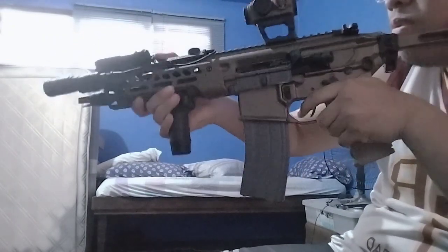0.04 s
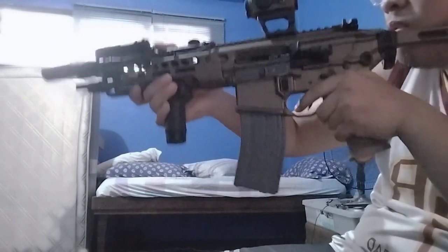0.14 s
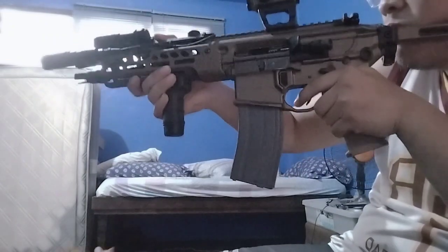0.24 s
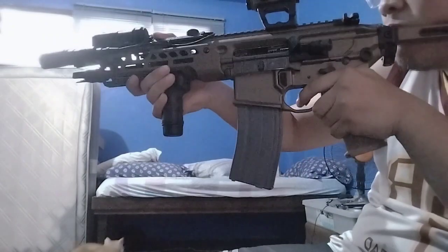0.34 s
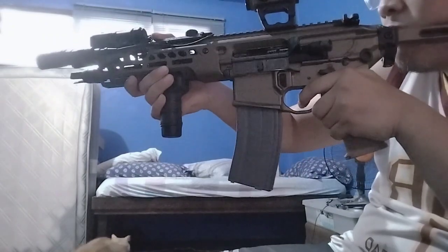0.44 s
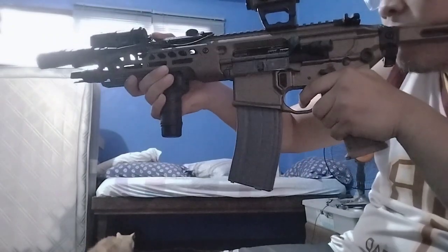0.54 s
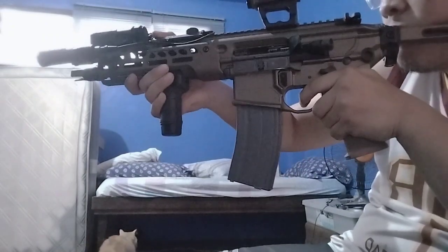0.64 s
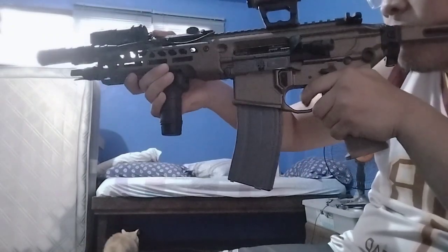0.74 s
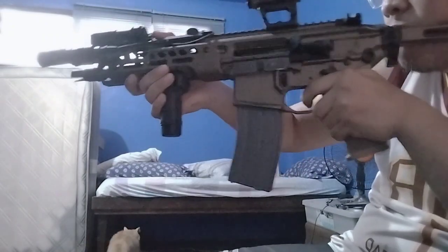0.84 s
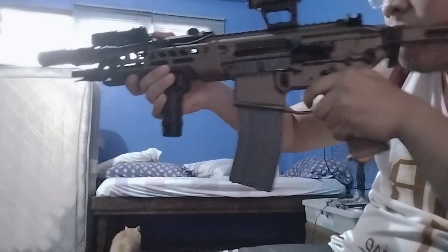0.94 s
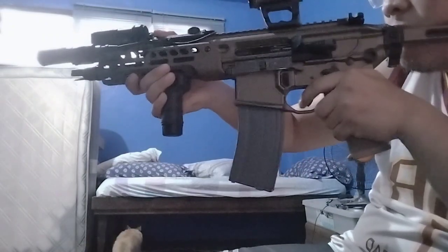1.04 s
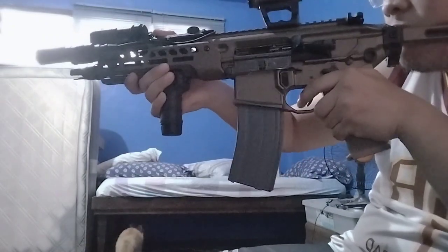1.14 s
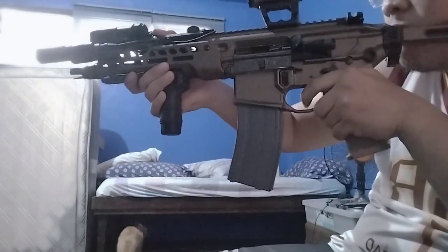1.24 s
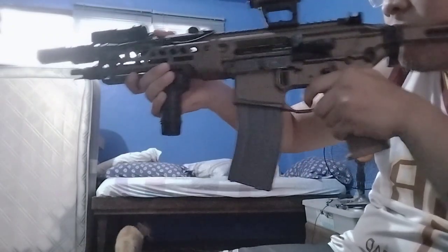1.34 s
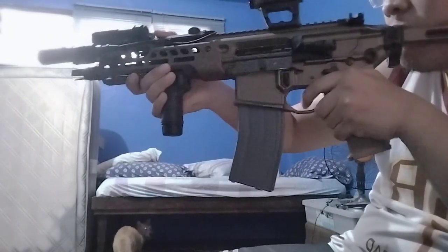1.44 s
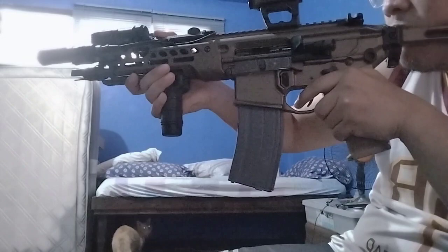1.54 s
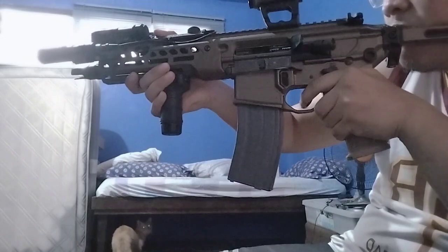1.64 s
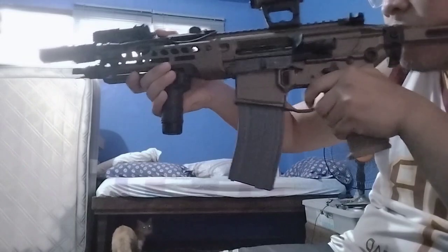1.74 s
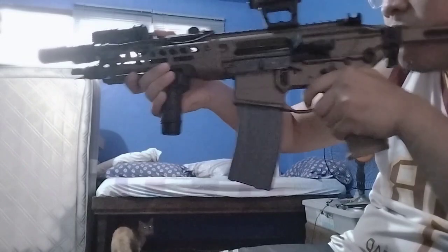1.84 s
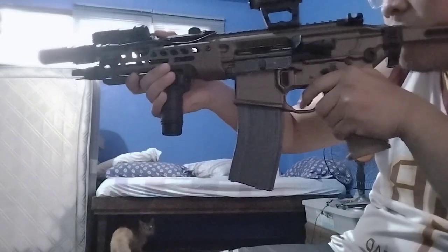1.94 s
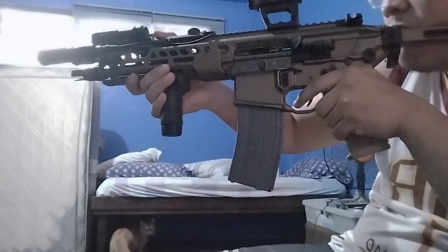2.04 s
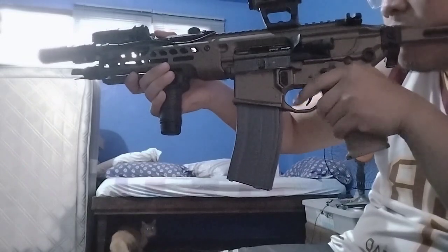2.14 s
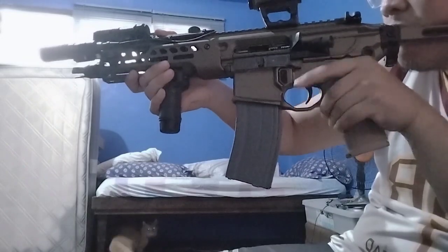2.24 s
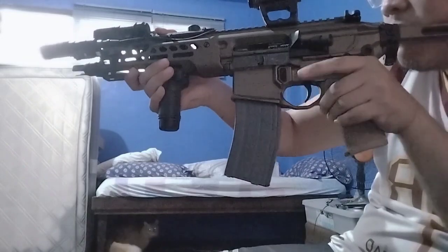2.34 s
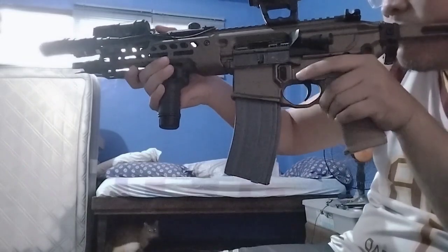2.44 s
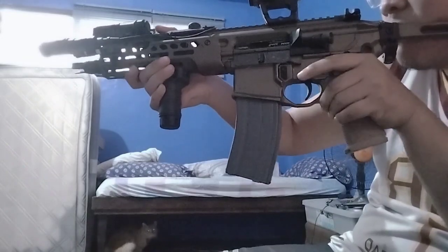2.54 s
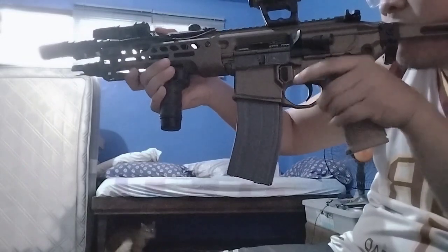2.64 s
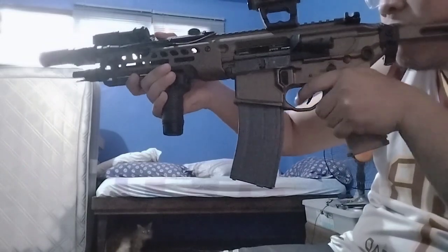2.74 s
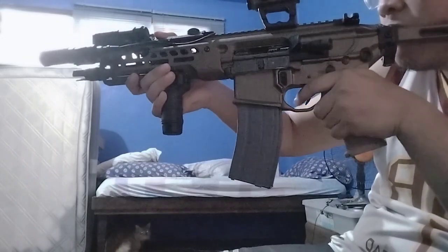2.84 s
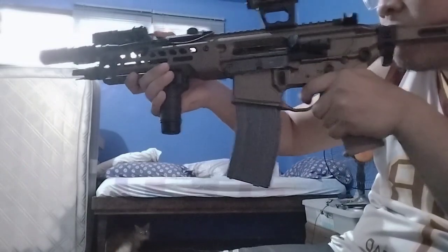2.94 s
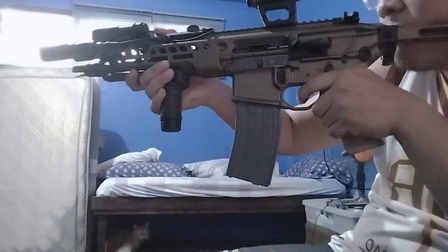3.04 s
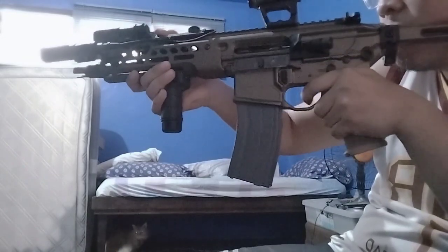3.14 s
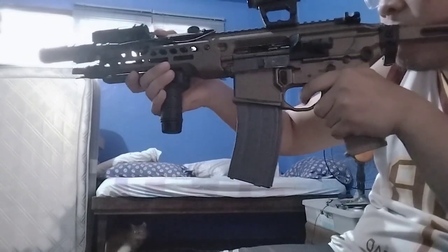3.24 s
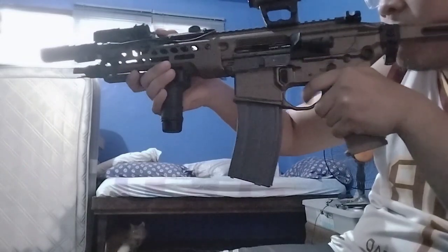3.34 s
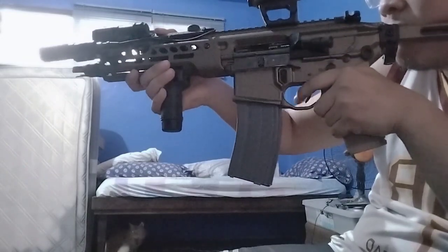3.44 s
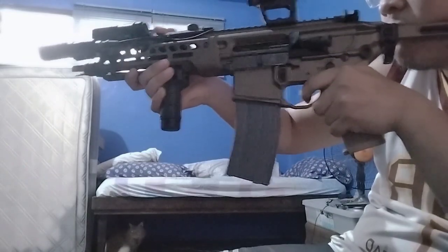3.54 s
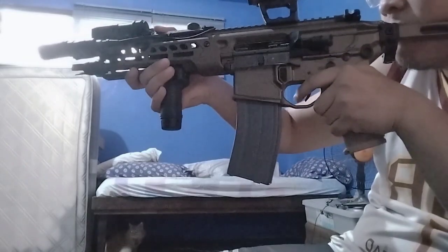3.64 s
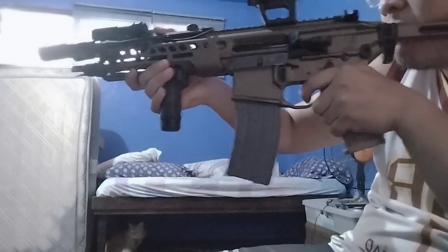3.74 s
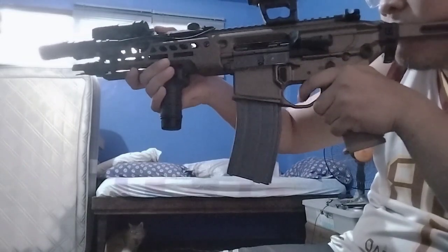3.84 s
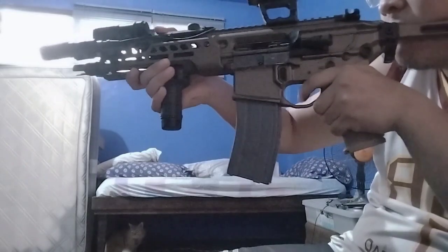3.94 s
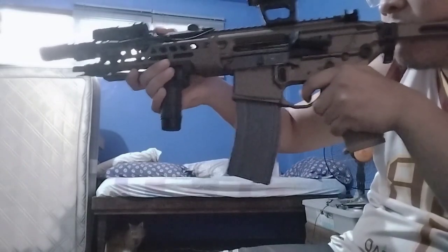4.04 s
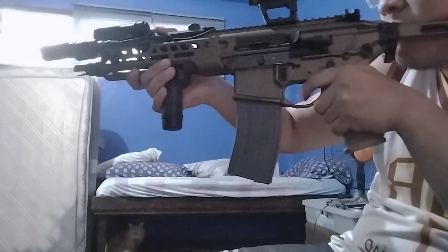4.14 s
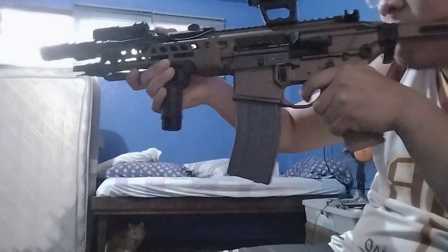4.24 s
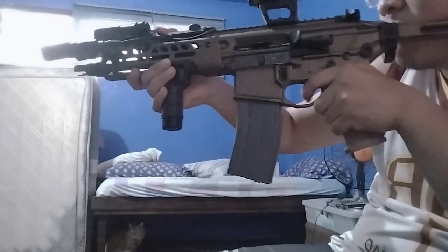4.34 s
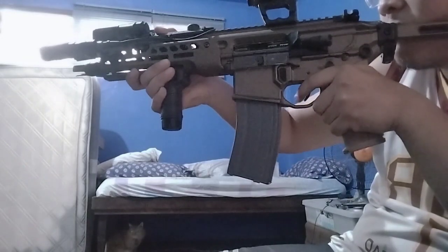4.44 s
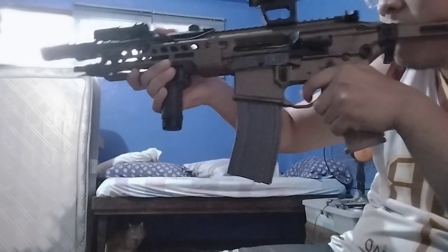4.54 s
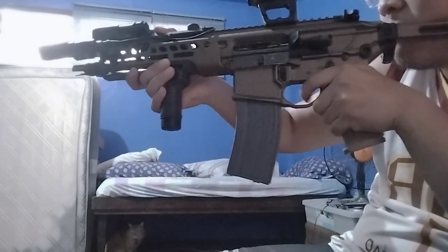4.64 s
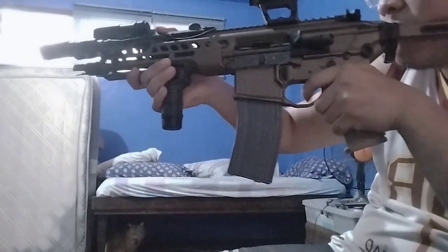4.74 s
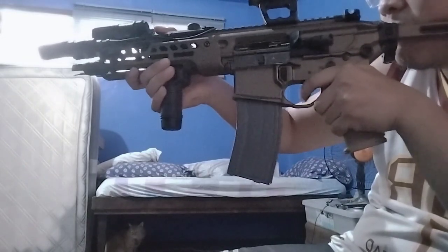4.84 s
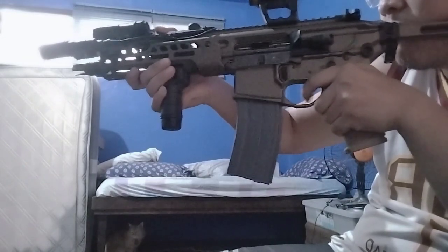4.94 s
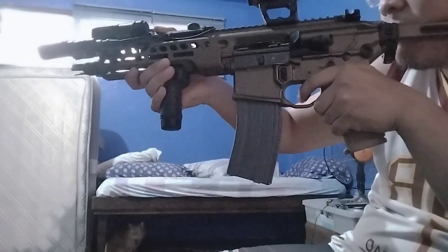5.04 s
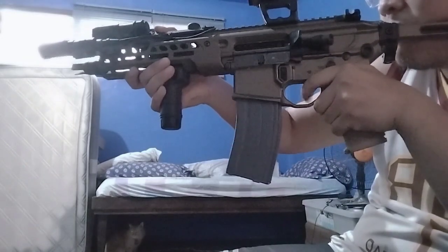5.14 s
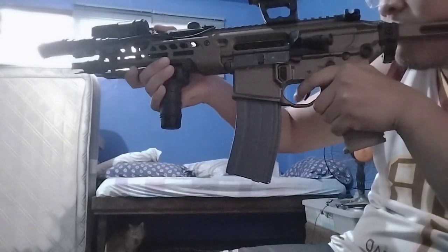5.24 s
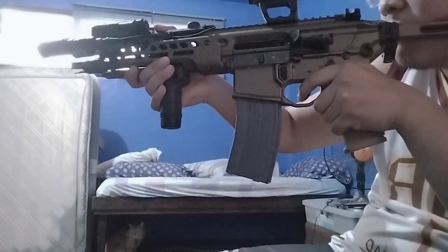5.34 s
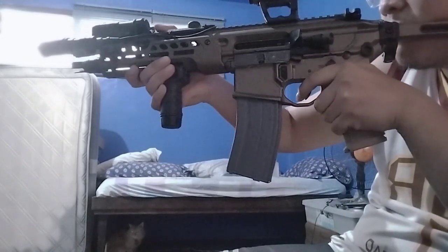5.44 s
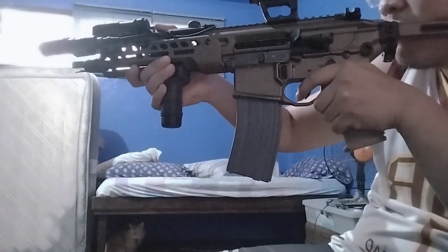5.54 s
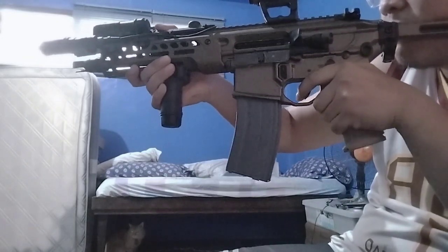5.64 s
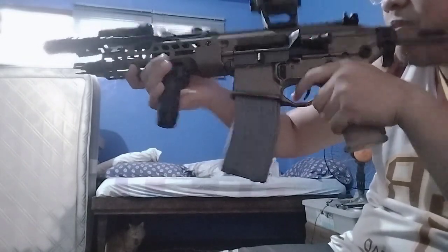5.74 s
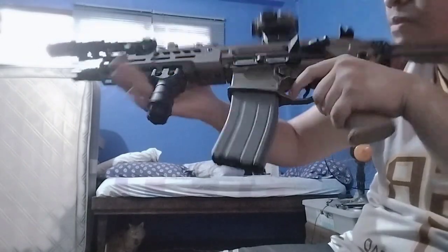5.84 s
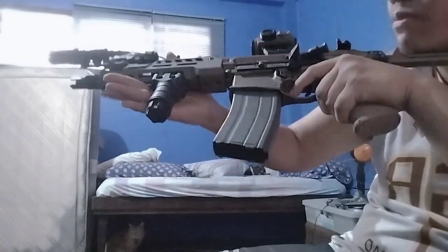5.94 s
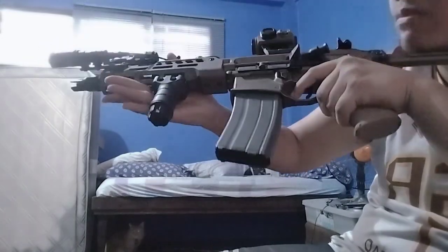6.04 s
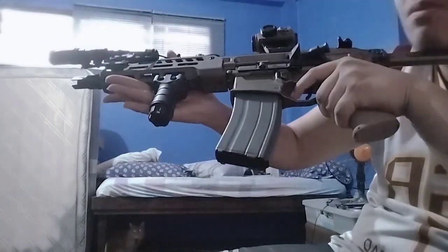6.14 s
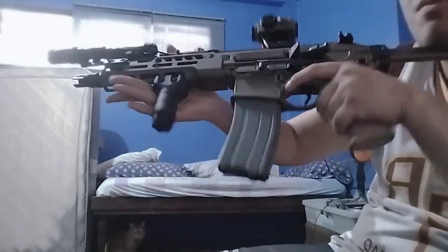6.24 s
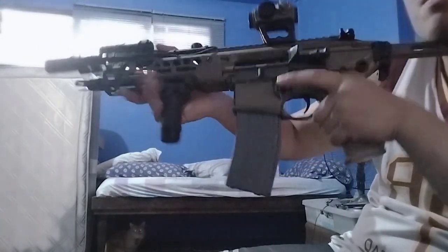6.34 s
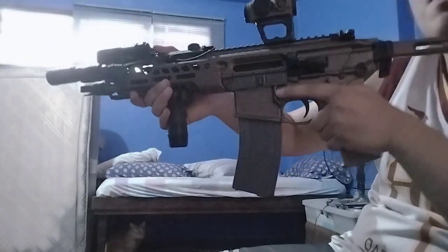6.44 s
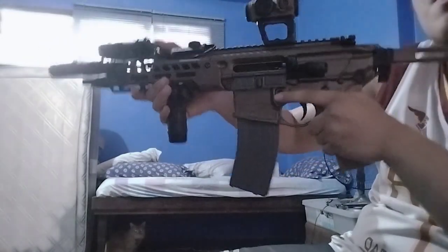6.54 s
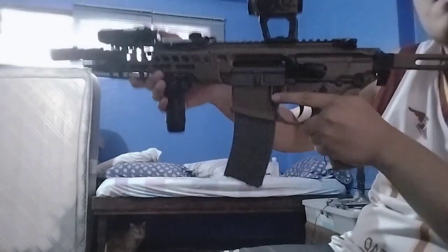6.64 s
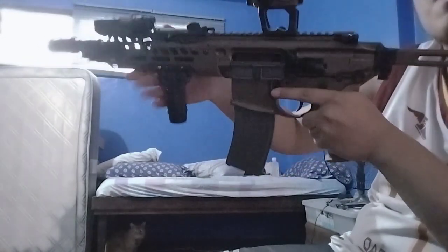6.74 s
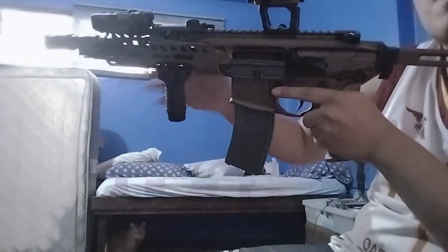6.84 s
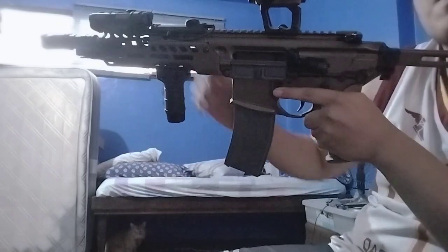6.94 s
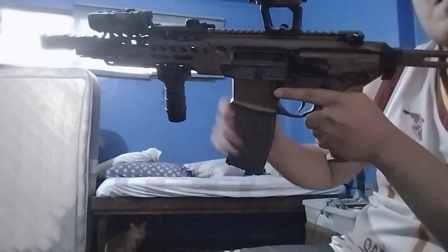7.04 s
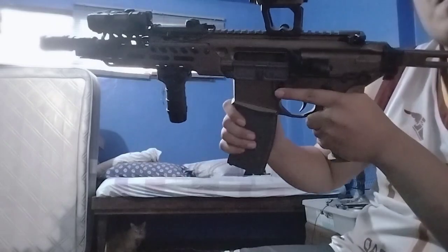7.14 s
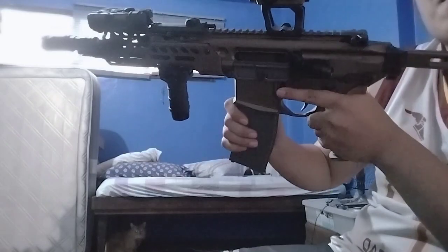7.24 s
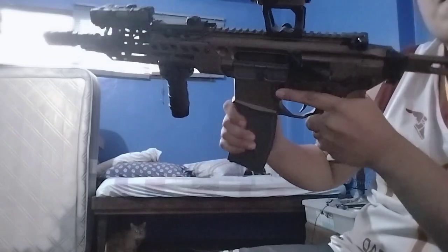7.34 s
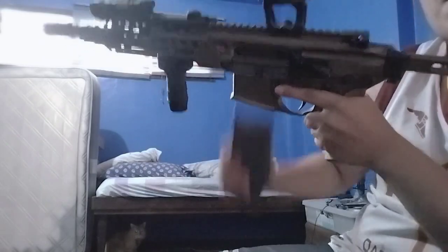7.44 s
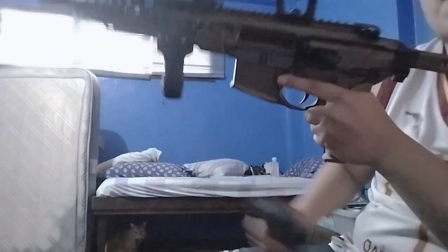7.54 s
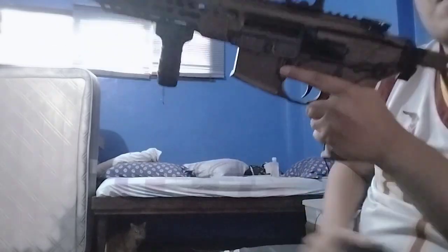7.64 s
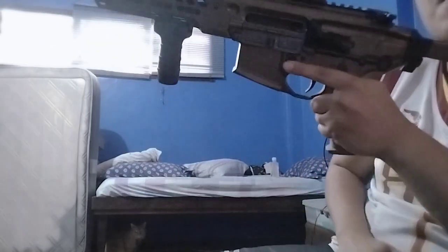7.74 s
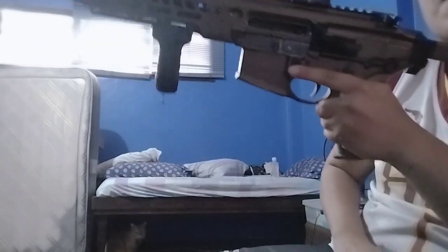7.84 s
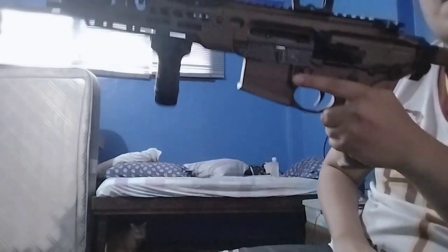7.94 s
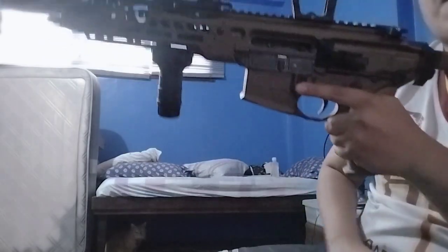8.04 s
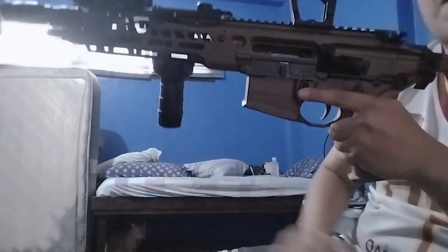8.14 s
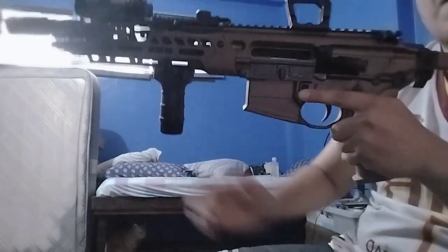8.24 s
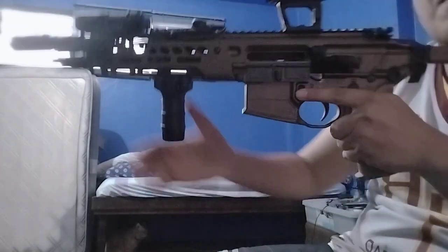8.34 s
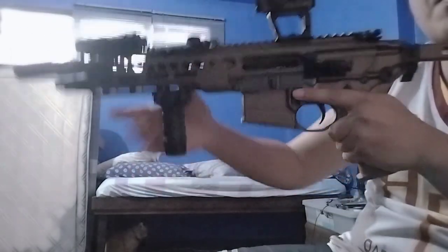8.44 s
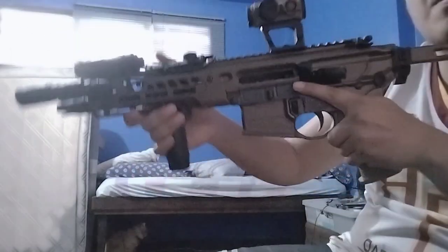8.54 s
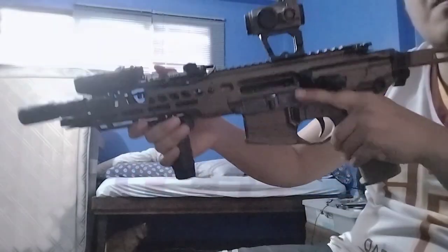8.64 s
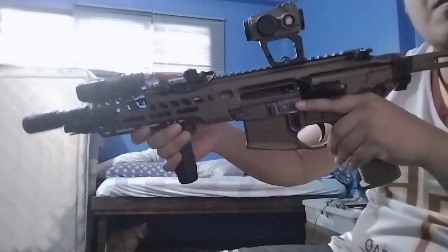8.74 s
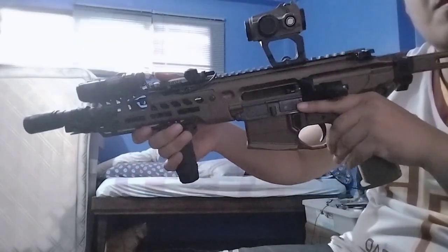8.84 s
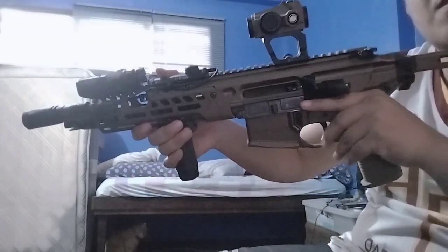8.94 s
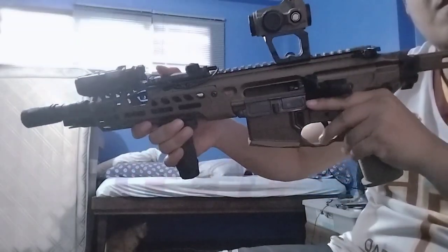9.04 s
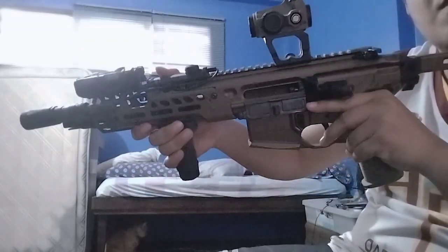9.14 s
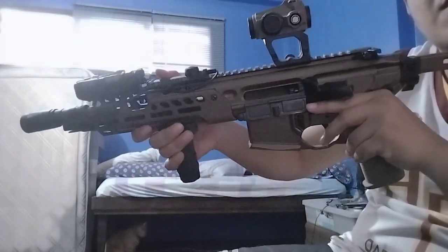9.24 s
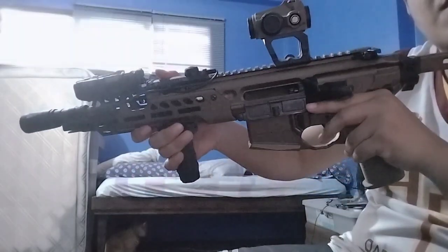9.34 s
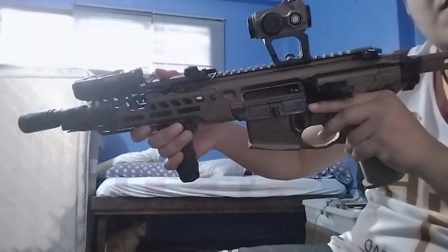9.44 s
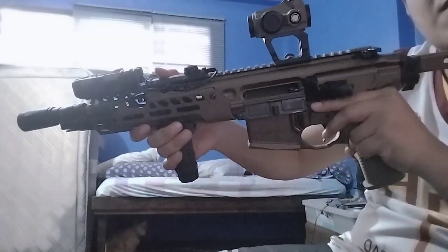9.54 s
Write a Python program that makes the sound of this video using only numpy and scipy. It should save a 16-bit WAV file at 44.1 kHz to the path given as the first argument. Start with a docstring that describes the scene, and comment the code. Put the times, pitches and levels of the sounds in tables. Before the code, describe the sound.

A gas airsoft rifle close by rattles off three fast bursts, then twelve spaced single shots in a small bedroom, followed by quiet handling clicks.

```python
"""A low room tone and hum come first: filtered noise and wavering sine waves in a small bedroom.
Close by, a gas airsoft rifle fires three short bursts, then twelve single shots. Noise bursts make the
gas blasts and metal clatter, fading sine waves make the ringing, and random reflections make the room.
One selector click falls between bursts and singles; more handling clicks, a magazine slide and soft
rumbles follow the shots. Loud sound turns the microphone gain down, and it slowly recovers."""
import sys
import numpy as np
from scipy import signal
from scipy.io import wavfile
from scipy.ndimage import uniform_filter1d

SR = 44100
rng = np.random.default_rng(int(sys.argv[2]) if len(sys.argv) > 2 else 0)


def bounce(signal):
    """Save signal as a 16-bit WAV file at the path given by the first command-line argument."""
    frames = np.transpose(np.atleast_2d(signal))
    limited = np.clip(frames, -1, 1)
    pcm = np.round(limited * 32767).astype(np.int16)
    wavfile.write(sys.argv[1], SR, pcm)


N = 423360

# Levels are relative settings ahead of the gain control, except the lurches, added after it.
# Room air noise, its shape only: pitch_hz, level_db (per Hz)
AIR_COLOUR = [(15, -33.5), (30, -15.5), (60, -5.5), (95, -12), (122, 3.5), (155, -13), (210, -18),
              (275, -6.5), (540, -11), (670, -9), (1100, -16), (2200, -24), (6500, -38), (15500, -54.5)]
AIR_DB = -50.5
# How alike the room air is at the two ports: pitch_hz, likeness (0 to 1)
AIR_LIKENESS = [(60, 0.55), (180, 0.65), (550, 0.43), (1650, 0.031), (4970, 0.071), (15000, 0.028)]
# Appliance hum: pitch_hz, level_db
HUM_TONES = [(121, -59.5), (183, -65)]
# Low rumble from moving about: start_s, level_db
SHUFFLE_LEVELS = [(7.0, -81), (7.01, -73), (7.19, -52), (7.22, -63), (7.28, -51), (7.41, -70), (7.53, -54),
                  (7.66, -80), (7.68, -64), (8.22, -64), (8.34, -52), (8.43, -64), (8.45, -53), (8.74, -68),
                  (8.96, -56), (9.56, -67), (9.6, -83)]

# One row per cycle of the action: start_s, gas_blast_db, bolt_slam_db, left_lurch_db,
# bolt_home_after_ms, bolt_home_db; the bolt locks open after the last shot, so that row stops early
SHOT_CYCLES = [(0.795, -4.5, -1.5, 2, 46.5, -9.5), (0.8518, 0, 3.5, -4, 49.2, -4.5),
               (0.9095, 1, 3, -8, 47.2, 2.5), (0.9713, 1, 4.5, -6, 47.4, -1),
               (1.2754, 1, 5.5, -8, 46.2, -3.5), (1.333, 0, 1.5, -2, 47.9, 1),
               (1.3916, -2, 2, -15, 50.8, -4), (1.6942, -1.5, 3.5, -1, 47.9, -1),
               (1.7512, -1, 0.5, -2, 51.8, -14), (1.81, -0.5, 0, -1, 50.5, -4),
               (1.87, -3, -2.5, -1, 51, -4), (2.9321, -1.5, 2.5, -6, 45.3, -1.5),
               (3.097, -1.5, 1.5, -4, 49.5, -5), (3.3055, -3, -4.5, -14, 49.3, -4.5),
               (3.5389, -2, -0.5, -9, 49.9, -6.5), (3.759, -2.5, -3, -10, 51.3, -5),
               (3.8992, -2.5, -2.5, -12, 52, -7.5), (4.0741, -3.5, -2, -6, 51.8, -7),
               (4.2856, -4, -3.5, -16, 52.8, -7), (4.5095, -3.5, -2.5, -8, 53, -9.5),
               (4.689, -4, -4.5, -6, 53.5, -7), (4.878, -4.5, -4.5, -8, 52.7, -6), (5.107, -4.5, -1.5, -7)]
BACK_MS = 13.3  # from the blast until the bolt reaches the buffer
# Gas noise: pitch_hz, level_db (per Hz)
GAS_COLOUR = [(90, -38.5), (150, -8.5), (220, -17), (410, -13), (880, -9), (2000, -6.5), (2900, -10.5),
              (4200, -8.5), (6500, -9), (9000, -20), (12000, -21.5), (14600, -20), (15800, -20.5)]
# Steel on steel: pitch_hz, level_db (per Hz)
CLATTER_COLOUR = [(180, -29.5), (300, 0), (1260, -3.5), (2480, -0.5), (3940, -3), (6050, -1), (9300, -12),
                  (14600, -12.5), (15800, -15)]
# Receiver and rail ringing: pitch_hz, level_db, fade_by_60_db_s
RECEIVER_MODES = [(305, -7.5, .03), (530, -10.5, 0.067), (728, -1.5, .015), (925, -4.5, 0.026),
                  (1080, -6.5, 0.028), (1296, -7, 0.0098), (1610, -7.5, .012), (1980, -5, 0.03),
                  (2150, -10.5, 0.027), (3742, -6.5, 0.011), (4320, -10, .01), (5230, -7, 0.014)]

# Soft furniture swallows lows first: pitch_hz, level_db
BEDDING_LOSS = [(60, -8), (300, -7.5), (700, -1), (1500, -4.5), (15000, -0.5)]
# How long the room rings: pitch_hz, fade_by_60_db_s
BEDROOM_DECAY = [(80, 0.12), (250, 0.22), (400, 0.36), (600, 0.25), (1100, .3), (3000, .29), (8000, 0.28),
                 (14000, .22)]
# Tone difference between the microphone ports: pitch_hz, left_minus_right_db (before levelling)
PORT_TONE = [(60, 10), (110, 19.5), (200, -6), (380, 2), (700, 1.5), (1290, -4), (2380, -2.5), (4400, -7.5),
             (8120, 4.5), (15000, -3)]

# Average lurch of the rest line, before its level; rows for blast, slam and home: left_jump, right_jump
LURCH_MEAN = [(-.45, 0.05), (.3, -1.1), (-.3, -.9)]
# Random spread of those jumps: left_jump, right_jump
LURCH_SPREAD = [.55, .6]
LURCH_AFTER_BLAST_MS, RIGHT_LURCH_DB = 4.5, -12

# Selector, magazine catch and handling clicks: start_s, level_db, ring_hz, ring_db,
# snap_db (near 5 kHz), treble_db, left_minus_right_db
CLICK_EVENTS = [(2.5003, -28.5, 2158, -4, 5.5, -9, 0), (6.5226, -38, 3800, -19, -1, -5, 7),
                (7.1967, -46, 1964, -2.5, -6, -24, -2), (7.4455, -31, 2306, -2, -5, -14, 0.5),
                (7.6784, -58, 2230, -11.5, -5, -22, -3), (7.719, -47.5, 1976, -6, -6, -24, -2),
                (8.765, -38.5, 3050, -12, -2, -1, -1)]
# Sliding magazine: pitch_hz, level_db (per Hz)
SCRAPE_COLOUR = [(500, -20.5), (1000, -5), (2300, -1), (3900, 1), (5500, -9), (8000, -11), (10400, -23.5),
                 (15500, -19)]
SLIDE_S, SLIDE_HOLD_S, SLIDE_DB = 7.4, .02, -48
SLIDE_RISE_DB_PER_S, SLIDE_FALL_DB_PER_S = 380, 260


def gain_of(db):
    """Turn decibels into a multiplier."""
    return 10 ** (np.asarray(db) / 20)


def evened(x):
    """Scale a signal to an average (RMS) strength of 1."""
    return x / np.sqrt(np.mean(x ** 2) + 1e-20)


def read(points, hz):
    """Read a table between its points, on a logarithmic pitch scale."""
    f, value = np.transpose(points)
    return np.interp(np.log(hz + 1), np.log(f + 1), value)


def add(mix, s, sound):
    """Mix a sound in at a time in seconds, cutting what runs past the end."""
    part = mix[..., round(s * SR):][..., :sound.shape[-1]]
    part += sound[..., :part.shape[-1]]


def coloured(x, points):
    """Filter with a given spectrum that never acts ahead of time; white noise keeps its power."""
    hz = abs(np.fft.fftfreq(4096, 1 / SR))
    log_gain = np.log(gain_of(np.maximum(read(points, hz), -80)))
    # minimum phase: the filter answers as early as it can
    taps = np.fft.ifft(np.exp(np.conj(signal.hilbert(log_gain)))).real[:2048]
    taps = taps / np.linalg.norm(taps)
    return signal.oaconvolve(np.atleast_2d(x), taps[None], axes=1)[:, :N]


def room_tone():
    """Soft air noise with drifting patches, a wavering hum and low rumble from movement."""
    frames, hz = N // 512 + 5, np.fft.rfftfreq(2048, 1 / SR)
    a, b, c, d, patches = rng.standard_normal((frames, 1025, 5)).T
    patches = uniform_filter1d(patches, size=12, axis=0)  # smooth over pitch
    patches = evened(uniform_filter1d(patches, size=6, axis=1))  # smooth over time
    same = np.clip(read(AIR_LIKENESS, hz), -1, 1)[:, None]
    left, other = a + 1j * b, c + 1j * d
    spectra = np.array([left, same * left + np.sqrt(1 - same ** 2) * other])

    def sound(gain):
        """Turn the shaped noise spectra into an evened stereo sound."""
        return evened(signal.istft(spectra * gain, nperseg=2048, noverlap=1536)[1][:, :N])

    out = gain_of(AIR_DB) * sound(gain_of(read(AIR_COLOUR, hz)[:, None] + patches))
    for f, db in HUM_TONES:
        pitch, swell = (evened(uniform_filter1d(v, size=5000)) for v in rng.standard_normal((2, N)))
        tone = np.sqrt(2) * np.sin(2 * np.pi * np.cumsum(f + 3 * pitch) / SR)
        out += gain_of(db + 2.5 * swell) * tone
    s, db = np.transpose(SHUFFLE_LEVELS)
    rumble = sound(1 / (1 + ((hz[:, None] - 50) / 30) ** 4))  # centred on 50 Hz
    level = gain_of(np.interp(np.arange(N) / SR, s, db, -90))
    return out + level * rumble * gain_of([[-4.5], [0.5]])  # left, right


def puff(rise_ms, fall_ms, grit_db):
    """A noise burst from a wide source, partly different at each port; grit makes it a tick cluster."""
    ms = np.arange(4000) / SR * 1000
    both, left, right, grit = rng.standard_normal((4, len(ms)))
    grit = gain_of(grit_db * evened(uniform_filter1d(grit, size=24)))
    noise = evened(both + 1.99 * np.array([left, right]))
    envelope = (1 - np.exp(-ms / rise_ms)) * np.exp(-ms / fall_ms)
    return envelope * noise * evened(grit)


def ring(blow, tilt_db):
    """Fading receiver modes; each blow draws slightly different pitches and levels; tilt in dB per octave."""
    hz, db, t60 = np.transpose(RECEIVER_MODES)[:, :, None]
    t = np.arange(3000) / SR
    # every fourth mode, from the third on, starts with the opposite sign
    sign = np.where(np.arange(len(hz)) % 4 == 2, 1, -1)[:, None]
    chance = rng.standard_normal((2, *hz.shape))
    db = db + tilt_db * np.log2(hz / 1000) + 2.5 * chance[0]
    hz = hz * (1 + 0.011 * chance[1])
    modes = (gain_of(db - 60 * t / t60) * np.sin(2 * np.pi * hz * t) * sign).sum(0)
    return signal.oaconvolve(blow / np.linalg.norm(blow[0]), modes[None], axes=1)


def rifle():
    """Gas jets, metal clatter and ringing of every cycle of the action."""
    gas, clatter, rings = np.zeros((3, 2, N))
    t = np.arange(1500) / SR
    # air swings briefly in the barrel shroud
    pop = np.sin(2 * np.pi * 165 * t) * (t / 0.0045) * np.exp(-t / 0.0029)
    firm_blow = np.hanning(22) * np.ones((2, 1))
    for s, gas_db, slam_db, _, *home in SHOT_CYCLES:
        back = s + BACK_MS / 1000
        # two soft metallic ticks rise just before the blast
        add(clatter, s - .008, gain_of(gas_db - 15.5) * puff(0.95, 7.2, 3.6))
        add(clatter, s - .0035, gain_of(gas_db - 5.5) * puff(1.5, 4, 3.9))
        # the gas blast, and the ringing it sets off
        add(gas, s - .001, gain_of(gas_db + 3) * puff(0.45, 7.6, 1.1))
        add(rings, s, gain_of(gas_db - 0.5) * ring(puff(0.35, 2.5, 6), -1.2))
        # the pellet uncorks the muzzle
        add(gas, s + 0.0042, gain_of(gas_db + 8) * puff(0.84, 3.5, 5.9))
        add(rings, s + 0.00095, gain_of(gas_db + 3.5) * pop)
        # the bolt slams back and the port vents
        add(rings, back + .0012, gain_of(slam_db - 8.5) * ring(firm_blow, -1.5))
        add(gas, back, gain_of(gas_db + 4.5) * puff(0.89, 11, 6))
        # the rebound, and the shudder of the buffer
        add(rings, back + .015, gain_of(slam_db - 9) * ring(puff(.8, 3, 2.8), -1.5))
        add(rings, back + .005, gain_of(slam_db - 8) * ring(puff(0.65, 4.5, 6), -1.3))
        add(clatter, back + 0.019, gain_of(gas_db + 4) * puff(1.5, 4, 6))
        if home:
            shut, db = s + home[0] / 1000, home[1]
            # a pellet is stripped from the magazine
            add(clatter, shut - .0058, gain_of(db - 4) * puff(0.85, 2.2, 2.8))
            # the bolt snaps home on its spring, then the carrier rattles out
            add(clatter, shut - .0004, gain_of(db + 9.5) * puff(.4, 2.4, 4))
            add(clatter, shut + 0.0015, gain_of(db + 6.5) * puff(.8, 4.9, 1.6))
            add(rings, shut, gain_of(db - 7) * ring(puff(0.16, .6, 3), 0.6))
    return coloured(gas, GAS_COLOUR) + coloured(clatter, CLATTER_COLOUR) + rings


def bedroom(x):
    """Dense random-sign reflections, each band fading at its own speed; three sets blend in turn."""
    taps = np.zeros((3, 2, 22000))  # sets, ports, samples
    at = np.arange(100, 21980, 10) + rng.integers(0, 10, (3, 2, 2188))
    np.put_along_axis(taps, at, rng.choice([-1., 1.], at.shape), 2)
    hz, t, z = signal.stft(taps, SR, nperseg=256)
    fade_db = read(BEDDING_LOSS, hz)[:, None] - 60 * t / read(BEDROOM_DECAY, hz)[:, None]
    tail = signal.istft(z * gain_of(fade_db), SR, nperseg=256)[1]
    tail[..., :100] = 0  # nothing comes back at once
    tail = tail / np.linalg.norm(tail[0, 0])
    # three sets of reflections blend in turn at 1.3 Hz, so tails vary
    turns = np.arange(N) / SR * 1.3 + np.arange(3)[:, None] / 3
    blend = np.sqrt(2 / 3) * np.cos(2 * np.pi * turns)
    return signal.oaconvolve((x * blend)[:, None], tail, axes=2).sum(0)[:, :N]


def lurches():
    """Each hard blow overloads the ports: their rest line jumps, swings past zero and settles."""
    out, ms = np.zeros((2, N)), np.arange(6000) / SR * 1000
    quick_ms, slow_ms, swing_hz, swing = 4.5, 17, 22, .45
    swinging = swing * np.exp(-ms / slow_ms) * np.sin(2 * np.pi * swing_hz * ms / 1000)
    shape = (1 - np.exp(-ms / 0.6)) * (np.exp(-ms / quick_ms) - swinging)
    chance = LURCH_MEAN + LURCH_SPREAD * rng.standard_normal((len(SHOT_CYCLES), 3, 2))
    for (s, _, _, left_db, *home), jumps in zip(SHOT_CYCLES, chance):
        blows_ms = [LURCH_AFTER_BLAST_MS, BACK_MS] + home[:1]
        for after_ms, jump in zip(blows_ms, jumps):
            size = jump * gain_of([left_db, RIGHT_LURCH_DB])
            add(out, s + after_ms / 1000, np.outer(size, shape))
    return out


def handling():
    """Small clicks with a short ring each, and the gritty slide of the magazine from its well."""
    out, t = np.zeros((2, N)), np.arange(2000) / SR
    for s, db, hz, ring_db, snap_db, treble_db, pan_db in CLICK_EVENTS:
        colour = [(700, -30), (hz, -3), (5200, snap_db), (7500, snap_db - 3),
                  (10000, treble_db - 9.5), (15000, treble_db)]
        click = 0.85 * coloured(puff(0.4, 3.6, 3.5), colour)[:, :2000]
        click += np.sin(2 * np.pi * hz * t) * gain_of(ring_db - 60 * t / 0.018)
        add(out, s, gain_of(db + np.array([[pan_db], [-pan_db]]) / 2) * click)
    # the scrape swells, holds and dies away
    since = np.arange(N) / SR - SLIDE_S
    rise_db, fall_db = SLIDE_RISE_DB_PER_S * since, SLIDE_FALL_DB_PER_S * (SLIDE_HOLD_S - since)
    level = gain_of(SLIDE_DB + np.minimum(np.minimum(rise_db, fall_db), 0))
    roughness = gain_of(1.4 * evened(uniform_filter1d(rng.standard_normal(N), size=60)))
    grit = rng.standard_normal((2, N)) * roughness
    return out + level * evened(coloured(grit, SCRAPE_COLOUR))


def scene():
    """Rifle and handling with their room reflections, shaped by the ports, over the room tone."""
    gun, hands = rifle(), handling()
    direct = np.array([gun[0], np.roll(gun[1], 3)])  # right port hears it 3 samples later
    near = direct + hands + bedroom(gain_of(-1.5) * gun[0] + gain_of(-4.5) * hands[0])
    ports = [[(f, side * db / 2) for f, db in PORT_TONE] for side in (1, -1)]
    return np.vstack([coloured(x, p) for x, p in zip(near, ports)]) + room_tone()


def record(dry):
    """Gain drops fast and recovers in a quick and a slow stage; then lurches, soft clip, treble cut."""
    power = abs(uniform_filter1d((dry ** 2).mean(0), size=200))
    over_db = np.maximum(10 * np.log10(power + 1e-12) + 29.5, 0)  # loudness above -29.5 dB
    t = np.arange(N) / SR

    def held(db, start_db, per_s):
        """Follow every rise at once, then sink at a steady rate in dB per second."""
        peak = np.maximum.accumulate(np.r_[start_db, db[1:]] + per_s * t)
        return np.maximum(peak - per_s * t, 0)

    # the slow stage builds up with the time spent loud and starts partly lowered
    loud_db = uniform_filter1d(over_db, size=6000, origin=2999)
    slow_db = held(0.32 * loud_db, 4.4, 1.327)
    quick_db = held(0.16 * over_db, 0, 7.8)
    out = dry / gain_of(uniform_filter1d(slow_db + quick_db, size=100)) + lurches()
    out = np.tanh(out / 1.1) * 1.1
    treble_cut = signal.firwin(511, 15700, window=("kaiser", 9), fs=SR)  # edge in Hz
    return signal.oaconvolve(out, treble_cut[None], "same")


dry = scene()
out = record(dry)
bounce(out)
```